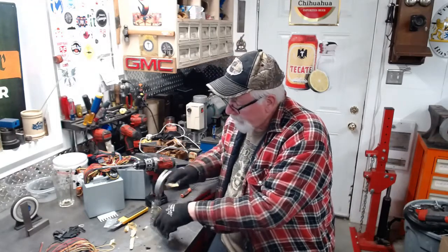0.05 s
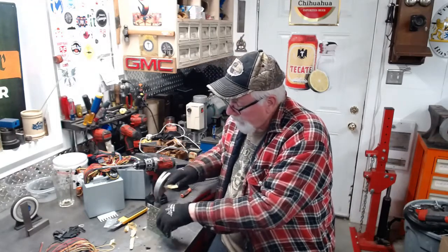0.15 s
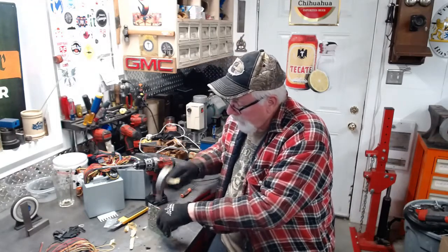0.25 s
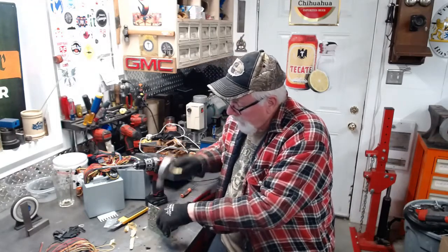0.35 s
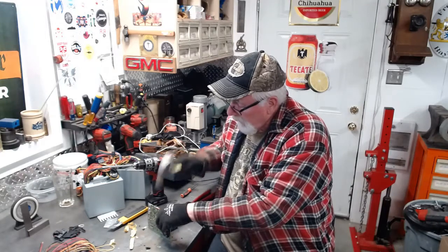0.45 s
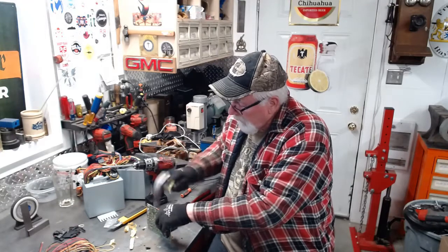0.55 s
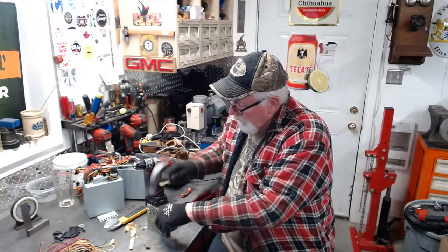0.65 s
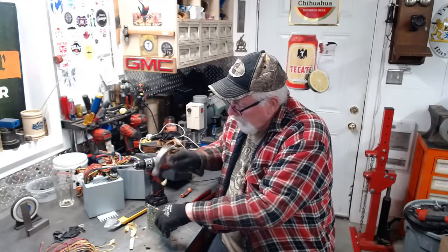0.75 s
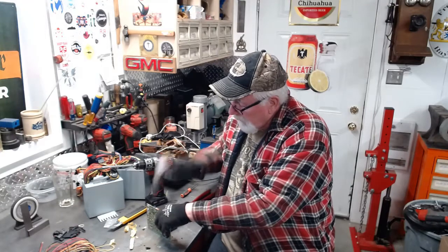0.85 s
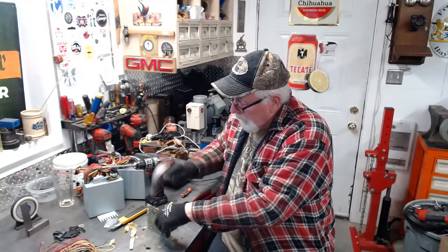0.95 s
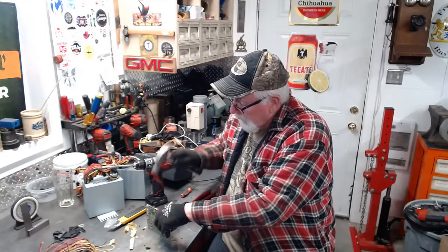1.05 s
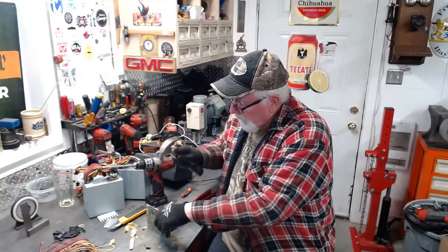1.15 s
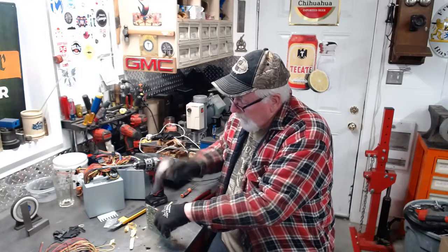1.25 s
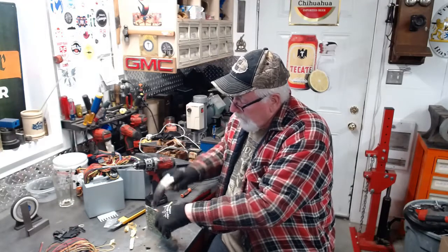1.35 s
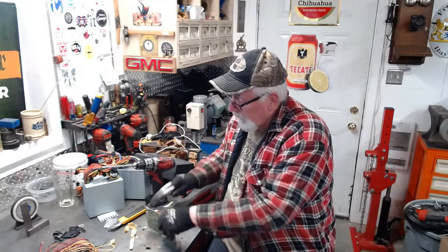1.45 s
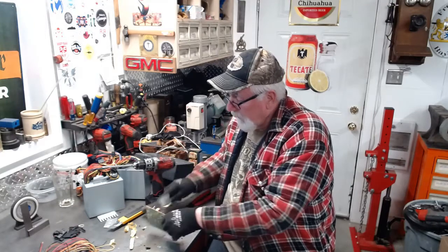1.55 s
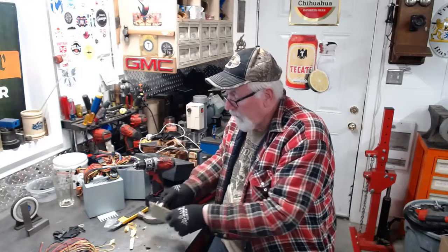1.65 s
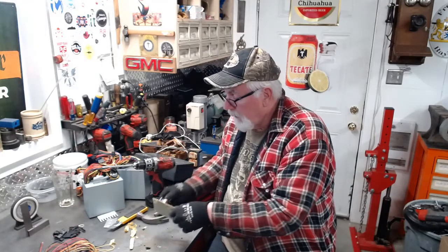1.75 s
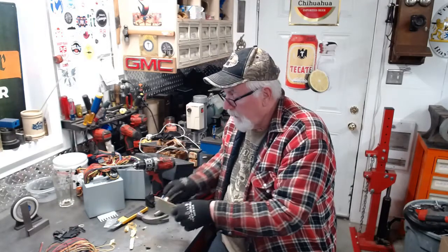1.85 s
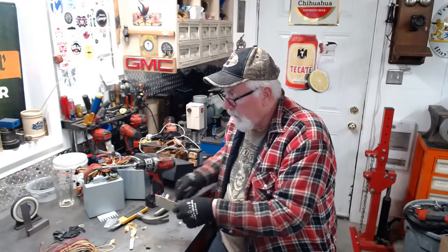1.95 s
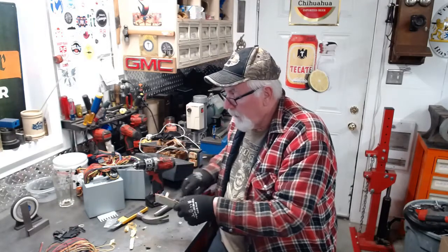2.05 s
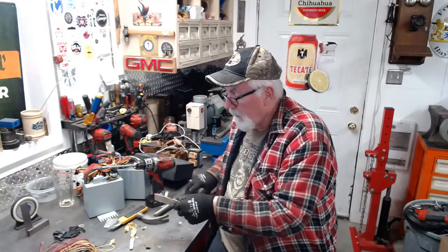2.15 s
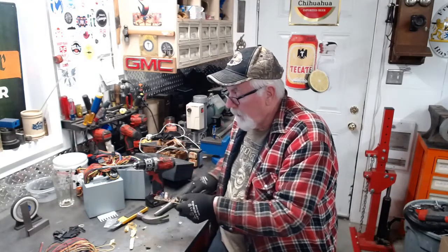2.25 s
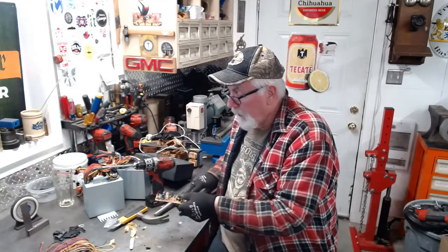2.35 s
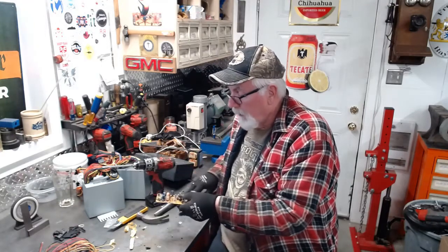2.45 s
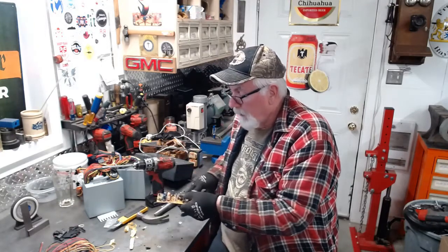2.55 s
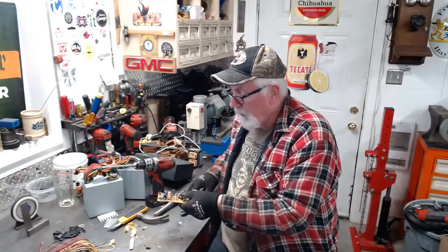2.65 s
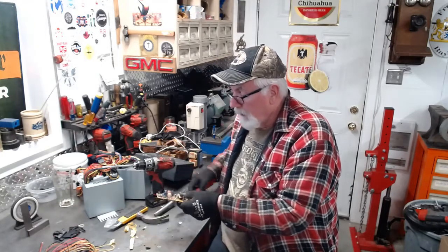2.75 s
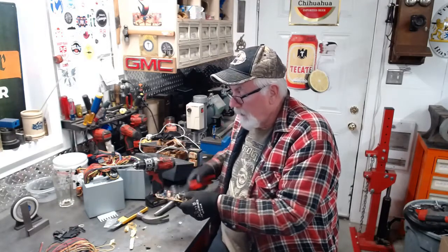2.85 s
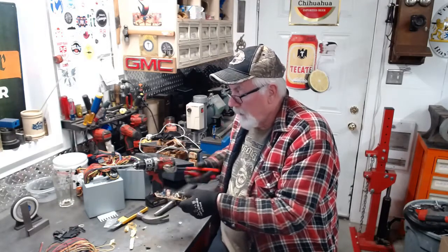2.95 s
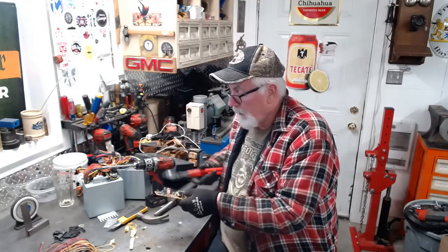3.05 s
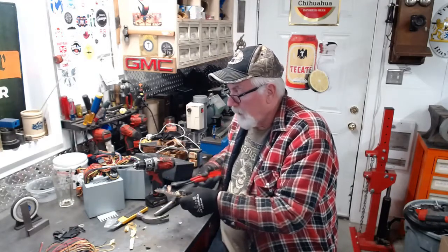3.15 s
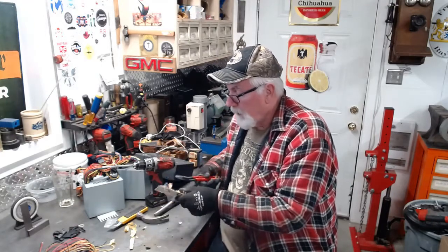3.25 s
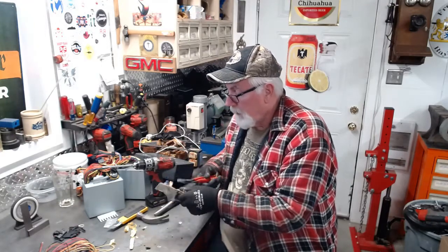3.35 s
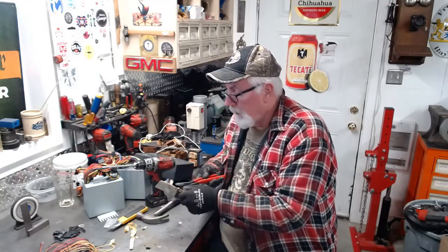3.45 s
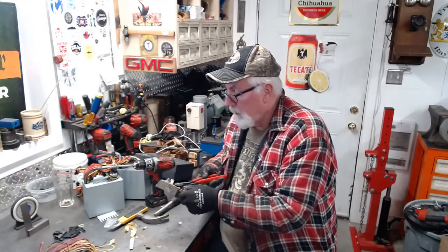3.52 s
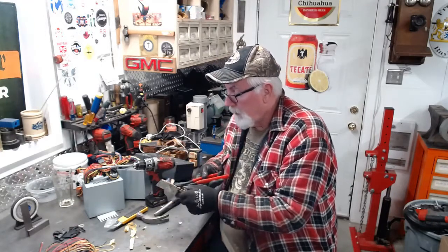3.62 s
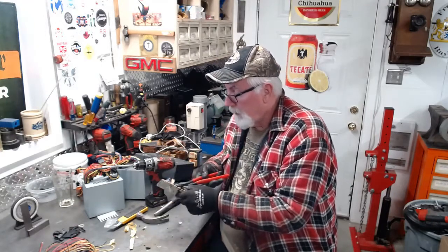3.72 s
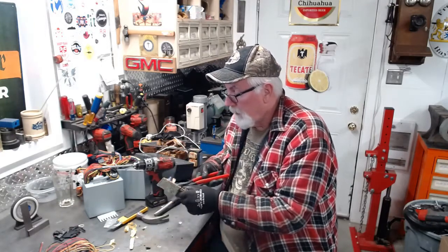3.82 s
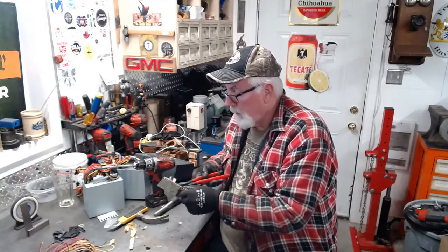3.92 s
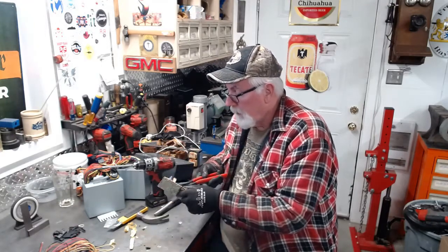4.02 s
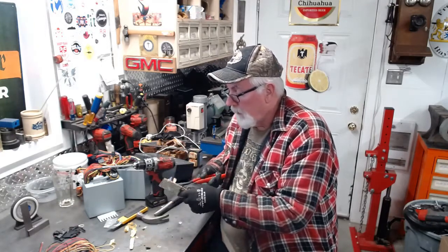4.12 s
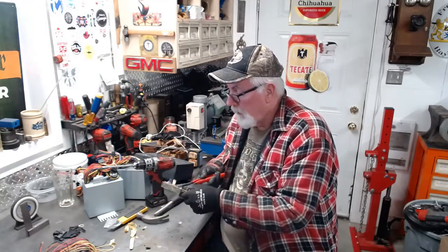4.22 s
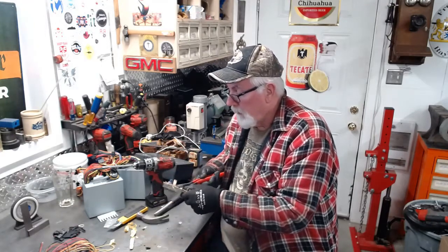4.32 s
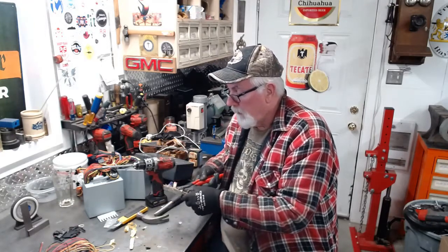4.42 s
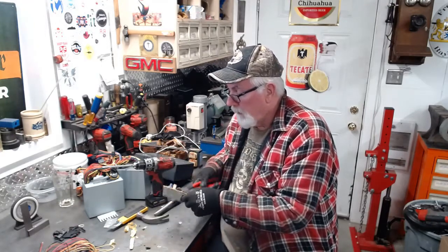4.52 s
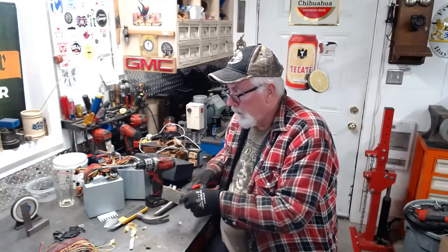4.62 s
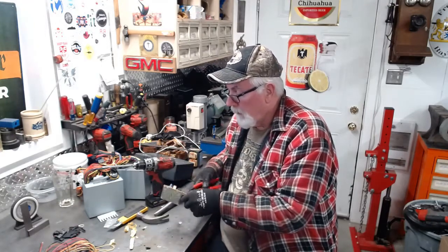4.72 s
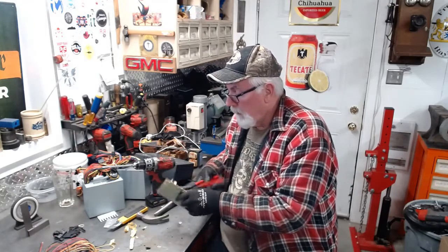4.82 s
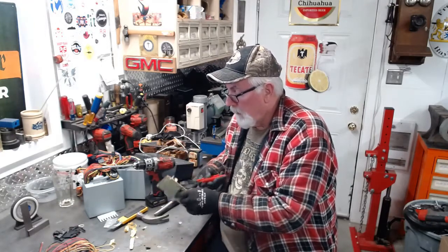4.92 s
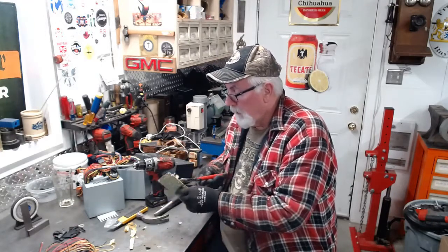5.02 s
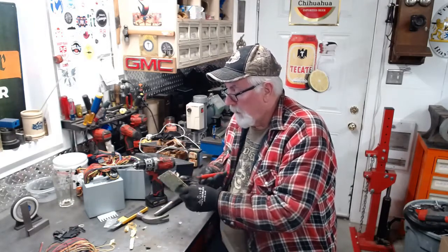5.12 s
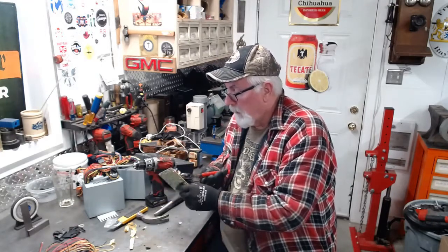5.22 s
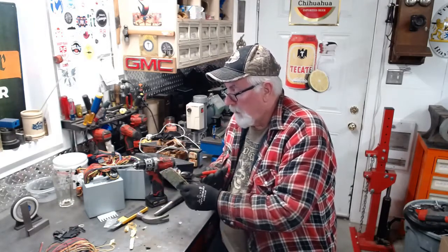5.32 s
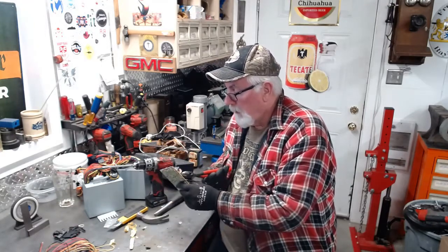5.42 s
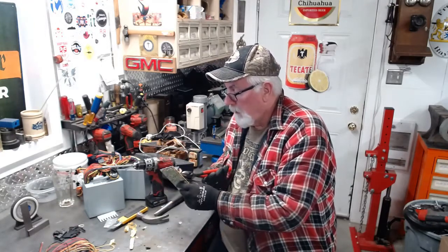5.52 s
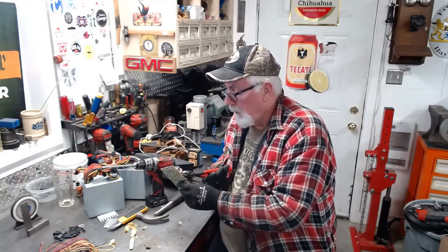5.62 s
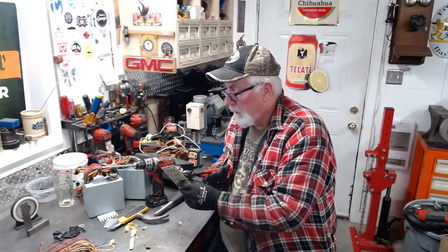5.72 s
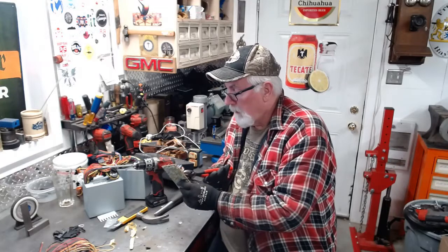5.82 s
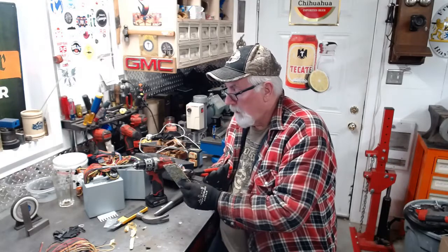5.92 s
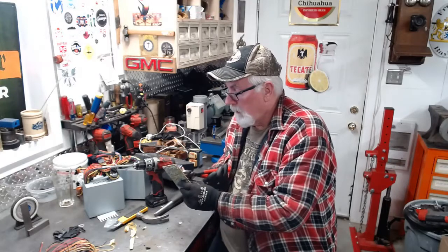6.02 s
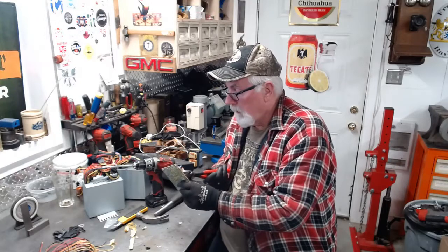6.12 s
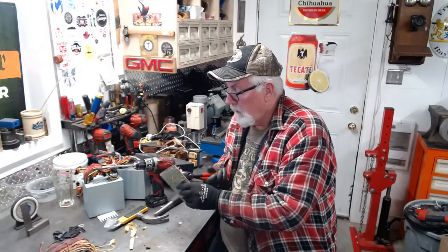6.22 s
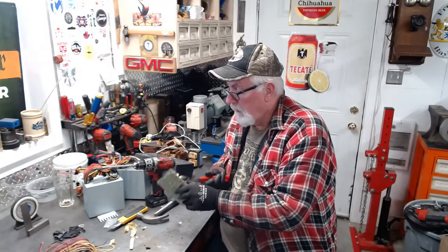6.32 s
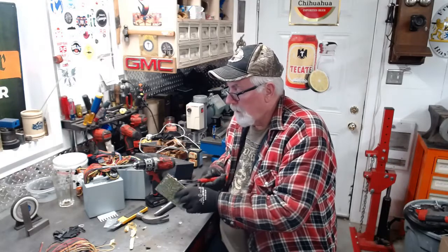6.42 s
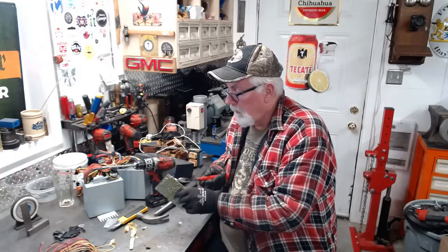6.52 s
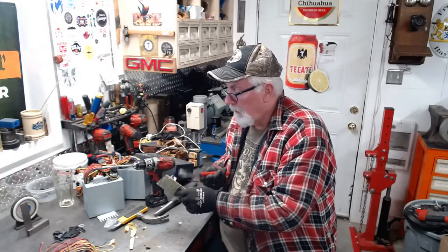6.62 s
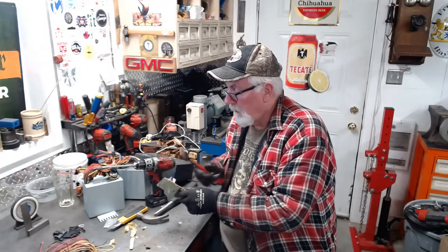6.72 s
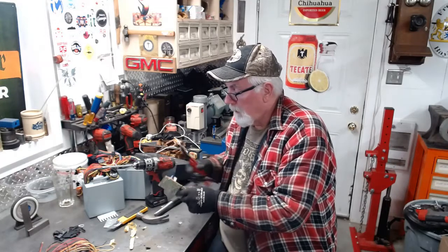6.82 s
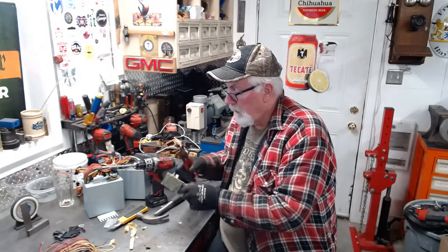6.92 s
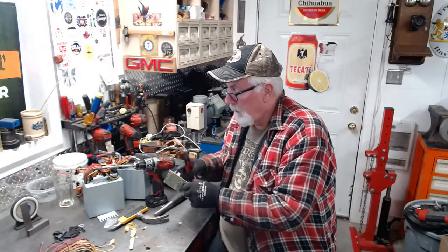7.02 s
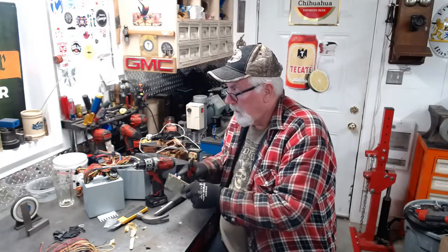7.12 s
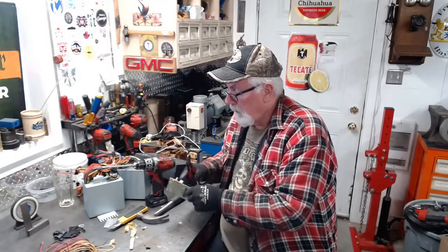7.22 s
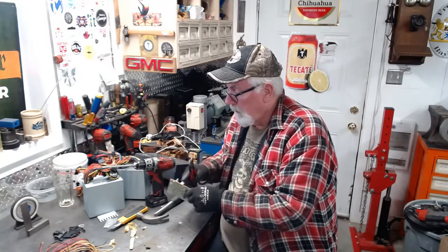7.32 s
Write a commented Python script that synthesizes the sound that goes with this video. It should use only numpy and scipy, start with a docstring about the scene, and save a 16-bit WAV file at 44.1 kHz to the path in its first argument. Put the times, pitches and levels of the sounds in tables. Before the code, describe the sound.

Two sharp hammer knocks on scrap, a ringing clatter on a steel workbench, then faint plier clicks over a low fan hum.

```python
"""Hammer and pliers at a workbench

In a small shed a hammer claw knocks scrap twice and the hammer drops on the steel top: each impact
rattles the scrap and excites the modes of the bench, and the drop rings the hammer too. A tool is laid
down and pliers pick at a small metal part with clicks and short rings. Gloves and sleeves rustle by
friction, a fan and mains hum fill the room, and a limiter holds the loud blows down."""
import sys
import numpy as np
from scipy import signal
from scipy.fft import rfft, irfft
from scipy.io import wavfile
from scipy.ndimage import uniform_filter1d, minimum_filter1d

SR = 44100
rng = np.random.default_rng(int(sys.argv[2]) if len(sys.argv) > 2 else 0)


def unload_audio(sound):
    """Save the sound as a 16-bit wav file, at the path given as the first command line argument."""
    columns = np.transpose(np.atleast_2d(sound))
    # keep every value between -1 and 1, then stretch to whole-number steps
    steps = np.round(np.clip(columns, -1, 1) * 32767)
    wavfile.write(sys.argv[1], SR, steps.astype(np.int16))


N = 325017


def amp(db):
    """Amplitude ratio of a level in decibels."""
    return 10 ** (np.asarray(db) / 20)


def unit_rms(x):
    """Normalisation to an rms of 1."""
    return x / np.sqrt(np.mean(x ** 2) + 1e-20)


def at_hz(points, hz):
    """Interpolation of (frequency, value) rows on a logarithmic frequency axis."""
    points_hz, values = np.array(points).T
    return np.interp(np.log(hz), np.log(points_hz), values)


def shaped_noise(size, gain_db):
    """Spectral shaping: white noise weighted by the function gain_db(hz), at rms 1."""
    hz = np.maximum(np.arange(size // 2 + 1) * SR / size, 1)
    spectrum = rfft(rng.standard_normal(size)) * amp(gain_db(hz))
    return unit_rms(irfft(spectrum, size))


def bell_db(hz, centre_hz, octaves):
    """Gaussian band on a log axis, 6 dB down at the given octaves from its centre."""
    return -6 * (np.log2(hz / centre_hz) / octaves) ** 2


def drift(rate_hz):
    """Random modulation at rms 1, lying mostly below rate_hz."""
    knots = rng.standard_normal(int(N / SR * rate_hz * 2) + 2)
    return unit_rms(np.interp(np.arange(N) / SR * rate_hz * 2, np.arange(len(knots)), knots))


def decay(t60_s, size):
    """Exponential decay from 1, falling 60 dB in t60_s (3 ms at the shortest)."""
    return amp(-60 * np.arange(size) / SR / max(t60_s, .003))


def add(out, start_s, sound):
    """Superposition of a sound on out from start_s."""
    i = round(start_s * SR)
    out[i:i + len(sound)] += sound[:N - i]


def fan():
    """Room resonance: steady air noise is reinforced at the standing waves between the walls."""
    # spectrum of the moving air: frequency_hz, density_db
    air_spectrum = [(8, -25.5), (15, -4), (60, -7), (110, -11.5), (190, -14), (230, -8), (500, -9.5),
                    (680, -15.5), (1400, -17), (2100, -28), (6000, -42.5), (8200, -53.5)]
    # standing waves: centre_hz, width_hz, lift_db
    room_modes = [(22, 12, 9), (66, 16, 6), (145, 8, 6), (238, 25, 7), (265, 12, 7), (300, 12, 3),
                  (345, 14, 5), (415, 28, 7), (463, 14, 8), (490, 14, 7), (512, 18, 6), (551, 14, 5),
                  (610, 14, 8), (655, 20, 4), (750, 30, 5), (805, 25, 4), (900, 20, 4), (930, 16, 5),
                  (998, 15, 5), (1149, 30, 5), (1900, 120, 3)]

    def gain_db(hz):
        lift_db = sum(db / (1 + (2 * (hz - centre) / width) ** 2) for centre, width, db in room_modes)
        return at_hz(air_spectrum, hz) + lift_db
    return amp(-48.5 + .6 * drift(rate_hz=6)) * shaped_noise(N, gain_db)


def mains_hum():
    """Harmonics: even multiples of the mains frequency, each wavering a little in level."""
    # hum partials: pitch_hz, rms_db, waver_db
    harmonics = [(120, -59, 1.2), (360, -58, 1.5)]
    t = np.arange(N) / SR
    out = np.zeros(N)
    for hz, rms_db, waver_db in harmonics:
        amplitude = np.sqrt(2) * amp(rms_db + waver_db * drift(rate_hz=4.4))
        out += amplitude * np.sin(2 * np.pi * (hz * t + rng.random()))
    return out


def cloth_rustle():
    """Stick-slip friction: fibres catch and let go, so each stroke is a swell of grainy, bright noise."""
    # strokes of sleeve and glove: centre_s, level_db, half_length_s
    strokes = [(0, -63, .027), (.111, -61, .053), (.196, -70, .054), (1.379, -62, .062), (1.632, -68, .046),
               (2.24, -65.5, .07), (2.515, -61.5, .043), (2.725, -65.5, .044), (2.936, -67.5, .18),
               (3.176, -62.5, .084), (3.321, -70.5, .06), (3.72, -72, .04), (3.829, -73, .03),
               (4.573, -70, .06), (4.823, -74, .04), (5.096, -70, .03), (5.43, -74, .05), (5.926, -72, .05),
               (6.252, -66, .05), (6.418, -73, .04), (7.299, -73, .07)]
    t = np.arange(N) / SR
    stroke_power = sum(amp(2 * db) * np.exp(-2 * ((t - s) / half) ** 2) for s, db, half in strokes)
    fidget = amp(-81.5 + 5 * drift(rate_hz=6))   # small hand movements come and go
    friction = shaped_noise(N, lambda hz: bell_db(hz, 4400, octaves=2.7) - 3 * (hz / 6000) ** 4)
    grain = amp(1.8 * drift(rate_hz=70))
    return np.sqrt(stroke_power + fidget ** 2) * friction * grain


def resonator(impulses, hz, t60_s):
    """Damped oscillator: a unit impulse starts a decaying sine of amplitude 1."""
    radius, angle = amp(-60 / (t60_s * SR)), 2 * np.pi * hz / SR
    feedback = [1, -2 * radius * np.cos(angle), radius ** 2]
    return signal.lfilter([0, np.sin(angle)], feedback, impulses + 1e-18)


def plier_clicks():
    """Impulse excitation: a contact cracks, thumps through hand and bench, and rings the metal's modes."""
    # contacts of tool and part: start_s, level_db, crack_hz, width_octaves, thump_db,
    # then a pair for each prominent mode: pitch_hz, relative_db
    contacts = [(.1296, -37.5, 3950, .55, 16, 3200, -5), (.1414, -39, 4000, .8, 16.5, 1950, -7),
                (2.6224, -39, 3500, .75, 13, 6390, -12, 3830, -5),
                (2.632, -40, 2500, .6, 7.5, 1760, -6, 2500, -11), (3.036, -41.5, 5450, 1.3, -13, 3830, -10),
                (3.0494, -39, 5000, 1.1, -1, 2500, -13), (3.6336, -46, 2200, .8, 12, 2100, -4),
                (3.6611, -48.5, 5025, .9, 11, 3920, -3.5, 6550, -15), (4.2438, -47, 2800, .7, 4, 2100, -7),
                (4.4633, -22.5, 3980, 1.6, -9), (4.4994, -32, 3000, 1.1, -2, 2310, -13),
                (4.5301, -41.5, 4500, 1.1, -7, 4420, -.8), (4.6688, -47, 2600, .43, 4, 2310, -10),
                (4.7371, -40.5, 5480, 1.1, -3), (4.7594, -44, 3030, .85, 10, 3920, -5, 3060, -7),
                (4.9811, -35.5, 5000, .9, -1), (5.0194, -52, 2520, .9, -7, 2750, -8),
                (5.1243, -46, 3040, .9, 6), (5.1447, -33, 4200, .9, 3, 2100, -12.5),
                (5.2475, -48, 3400, .8, -5, 3200, -10), (5.3894, -54, 4610, .37, -11.5, 4620, -6),
                (5.4194, -55, 6000, .65, -4, 2310, -10), (5.8142, -48, 4480, .75, 3.5, 2310, -8),
                (5.8287, -43.5, 3800, 1.3, 9, 1760, -12), (5.875, -36, 3800, 1.4, 5, 2310, -15),
                (6.1779, -39, 4360, 1.3, 7, 1950, -11, 3400, -9.5),
                (6.3574, -37.5, 2500, 1.2, 8, 1950, -2.5, 6390, -14),
                (6.3904, -47, 3000, 1.2, -7, 2750, 0., 2100, -7),
                (6.5021, -33.5, 4560, .45, -3, 2310, -5, 4420, -9),
                (6.7067, -28, 4350, .5, -12, 3920, -16, 2100, -14),
                (7.1596, -40, 5500, 1.2, -20, 2750, -16), (7.233, -50.5, 4400, .4, -5, 4420, -9.5),
                (7.2759, -48.5, 4480, .8, -15, 3920, -9), (7.3357, -49.5, 4500, 1.6, 7, 1950, 2.)]
    # modes of tool and part: pitch_hz, t60_s
    part_modes = [(1760, .12), (1950, .06), (2100, .07), (2310, .065), (2500, .1), (2750, .05),
                  (3060, .045), (3200, .05), (3400, .045), (3830, .1), (3920, .06), (4180, .06),
                  (4420, .085), (4620, .05), (4860, .06), (5250, .05), (5700, .04), (6390, .2), (6550, .06)]
    part_hz = np.array(part_modes)[:, 0]
    clicks, impulses = np.zeros(N), np.zeros((len(part_modes), N))
    size = 8192
    rise = 1 - decay(.003, size)
    for start_s, level_db, crack_hz, octaves, thump_db, *prominent in contacts:
        crack = shaped_noise(size, lambda hz: bell_db(hz, crack_hz, octaves)) * decay(.052, size)
        thump = shaped_noise(size, lambda hz: bell_db(hz, 700, octaves=.97)) * decay(.06, size)
        add(clicks, start_s, amp(level_db - 8) * (crack + amp(thump_db - 4.5) * thump) * rise)
        drive = amp(level_db - 36 + 4 * rng.standard_normal(len(part_modes)))   # all modes stir a little
        for hz, relative_db in zip(prominent[::2], prominent[1::2]):
            drive[np.argmin(abs(part_hz - hz))] = amp(level_db + relative_db)
        impulses[:, round(start_s * SR)] = drive * rng.choice([-1, 1], len(part_modes))
    pings = sum(resonator(hits, hz, t60_s) for hits, (hz, t60_s) in zip(impulses, part_modes))
    return clicks, pings


def excite_modes(rings, start_s, drive_db, modes):
    """Free vibration: each mode of a struck body builds up over a few cycles, then decays."""
    t = np.arange(SR // 2) / SR
    for hz, mode_db, t60_s in modes:
        swing = np.sin(2 * np.pi * (hz * t + rng.random()))
        envelope = (1 - decay(4 / hz, len(t))) * decay(t60_s, len(t))
        gain = amp(drive_db + mode_db + 2.1 * rng.standard_normal())
        add(rings, start_s, gain * swing * envelope)


def bench_impact(rattle, rings, start_s, level_db, t60_s, tilt_db_per_octave, frame_db, bench_db):
    """Broadband excitation: a blow rattles loose scrap and drives the modes of frame and bench top."""
    # spectrum of the rattling scrap: frequency_hz, density_db
    scrap_spectrum = [(20, -40.5), (50, -25.5), (180, -20.5), (270, -5.5), (400, -12.5), (580, -3),
                      (950, -7.5), (1200, -7), (3000, -9.5), (6600, -16), (8190, -29.5)]
    # modes of legs and floor: pitch_hz, level_db, t60_s
    frame_modes = [(62, -8, .4), (88, 1, .5), (125, -8, .35), (165, -10, .3), (235, -3, .25)]
    # modes of the steel top: pitch_hz, level_db, t60_s
    bench_modes = [(263, 0, .35), (313, -2, .25), (400, -8, .25), (468, -3, .3), (498, 2, .3),
                   (560, -2, .25), (583, -1, .25), (610, -3, .25), (648, -1, .25), (748, 1, .25),
                   (822, 0, .2), (886, -3, .2), (1010, -3, .22), (1105, -6, .2), (1222, -5, .2),
                   (1300, -2, .2), (1696, -4, .2), (1804, -5, .2), (2002, -5, .2), (2085, -7, .2),
                   (2291, -6, .2)]
    size = 16384
    noise = shaped_noise(size, lambda hz: at_hz(scrap_spectrum, hz)
                         + tilt_db_per_octave * np.log2(hz / 1000))
    rise = 1 - decay(.003, size)   # the contact spreads over about half a millisecond
    add(rattle, start_s, amp(level_db) * noise * rise * decay(t60_s, size))
    excite_modes(rings, start_s, frame_db, frame_modes)
    excite_modes(rings, start_s, bench_db, bench_modes)


def claw_knocks(rattle, rings):
    """Double impact: the claw knocks the scrap twice, touching twice each time."""
    # claw contacts: start_s, level_db, rattle_t60_s, tilt_db_per_octave, bench_db
    contacts = [(.5338, -7, .048, .3, -27), (.539, -6, .055, -2.8, -27), (.8825, -7.5, .15, -3.5, -22),
                (.888, -6, .052, 4.5, -20.5)]
    for *contact, bench_db in contacts:
        bench_impact(rattle, rings, *contact, frame_db=-29, bench_db=bench_db)


def hammer_drop(rattle, rings):
    """Inelastic rebound: the hammer touches, lands and bounces, its steel ringing at each contact."""
    # contacts with the top: start_s, level_db, rattle_t60_s, hammer_db
    bounces = [(1.6739, -19.5, .06, -48), (1.6827, -4.5, .2, -21.5), (1.72, -5, .077, -19),
               (1.755, -8, .13, -34), (1.79, -17.5, .13, -38), (1.851, -27, .1, -39.5)]
    # modes of the hammer: pitch_hz, level_db, t60_s
    hammer_modes = [(583, 5, .28), (638, -2, .25), (997, -2, .25), (1112, 4, .22), (1272, -3, .25),
                    (1751, 1, .28), (1940, -3, .3), (2040, -2, .4), (2505, -2, .45), (2688, 1, .32),
                    (3108, -1, .35), (3200, -2, .4), (3390, -5, .35), (3555, -3, .3), (3766, -2, .33),
                    (4468, -4, .3), (4569, -4, .3), (4657, -1, .32), (5114, -5, .3), (5580, -9, .4),
                    (5680, -1, .25), (6115, -8, .28), (6928, -14, .35), (7620, -27, .55)]
    for start_s, level_db, t60_s, hammer_db in bounces:
        bench_impact(rattle, rings, start_s, level_db, t60_s, tilt_db_per_octave=2.1,
                     frame_db=level_db - 26, bench_db=level_db - 27)
        excite_modes(rings, start_s, hammer_db, hammer_modes)


def tool_set_down(rattle, rings):
    """Soft impact: a tool laid on the bench gives a faint, duller rattle."""
    # gentle contact: start_s, level_db, rattle_t60_s
    contacts = [(2.632, -41, .25)]
    for start_s, level_db, t60_s in contacts:
        bench_impact(rattle, rings, start_s, level_db, t60_s, tilt_db_per_octave=-1.6,
                     frame_db=level_db - 30, bench_db=level_db - 22)


def shed_reverb(x):
    """Reverberation: the direct sound plus a diffuse tail that decays at its own rate in each band."""
    # reverberation times of the shed: frequency_hz, t60_s
    decay_times = [(60, 0.29), (200, 0.3), (500, .38), (1200, 0.43), (3000, 0.4), (6000, 0.41),
                   (8000, 0.14)]
    tail_db, build_up_s = -9, .0024
    size = SR // 2
    tail = np.zeros(size)
    for hz in 40 * 2 ** np.arange(0, 8, .5):
        half_octave = signal.butter(2, [hz / 2 ** .25, hz * 2 ** .25], "band", fs=SR, output="sos")
        band = signal.sosfilt(half_octave, rng.standard_normal(size))
        tail += band * decay(at_hz(decay_times, hz), size)
    tail *= 1 - np.exp(-np.arange(size) / SR / build_up_s)   # echoes gather after the first walls
    tail /= np.sqrt(np.sum(tail ** 2))
    return x + amp(tail_db) * signal.fftconvolve(x, tail)[:N]


def limiter(x, ceiling_db, release_db_per_s):
    """Gain control: the level ducks just ahead of a peak and recovers at a steady rate."""
    release_db = release_db_per_s * np.arange(N) / SR
    held_peak_db = np.maximum.accumulate(20 * np.log10(abs(x) + 1e-9) + release_db) - release_db
    duck_db = np.minimum(ceiling_db - held_peak_db, 0)
    window = 89   # 2 ms of look-ahead and smoothing
    return x * amp(uniform_filter1d(minimum_filter1d(duck_db, window), window))


def scene():
    """Superposition: clicks and rattles excite the shed's echo; bench and hammer rings arrive direct."""
    rattle, rings = np.zeros((2, N))
    claw_knocks(rattle, rings)
    hammer_drop(rattle, rings)
    tool_set_down(rattle, rings)
    clicks, pings = plier_clicks()
    wall_share = .45   # fraction of the held part's ring that reaches the walls
    contacts = shed_reverb(rattle + clicks + wall_share * pings) + (1 - wall_share) * pings
    return (contacts + rings + cloth_rustle() + fan() + mains_hum())[None]


def record(dry):
    """Saturation and band limiting: rounded peaks, a dull top, a limiter, preamp hiss and a cut-off."""
    treble_hz, cutoff_hz, hiss_db = 7400, 8300, -86
    rounded = 1.1 * np.tanh(dry[0] / 1.1)   # the capsule overloads on the hardest peaks
    dull = signal.sosfilt(signal.butter(8, treble_hz, fs=SR, output="sos"), rounded)
    limited = limiter(dull, ceiling_db=-.9, release_db_per_s=119.5)
    hiss = amp(hiss_db) * rng.standard_normal(N)
    steep_lowpass = signal.cheby2(14, 24, cutoff_hz, fs=SR, output="sos")
    return signal.sosfiltfilt(steep_lowpass, limited + hiss)[None]


dry = scene()
out = record(dry)
unload_audio(out)
```